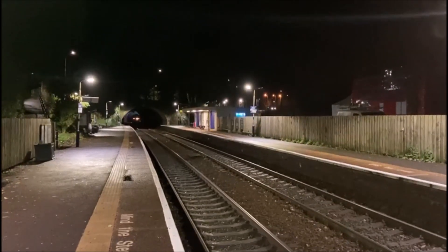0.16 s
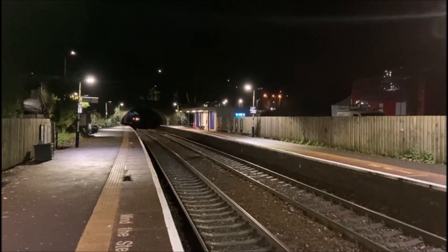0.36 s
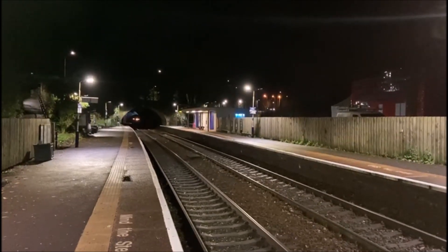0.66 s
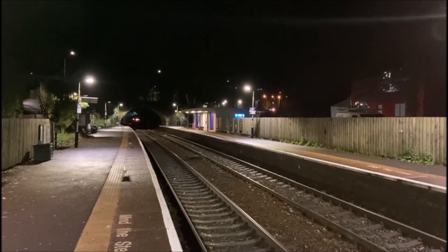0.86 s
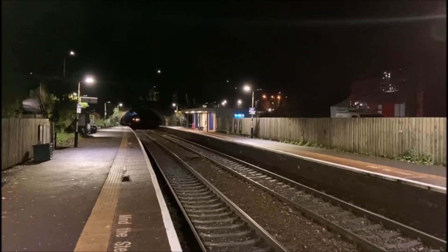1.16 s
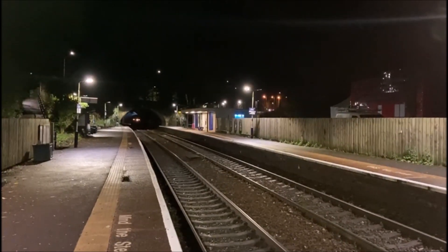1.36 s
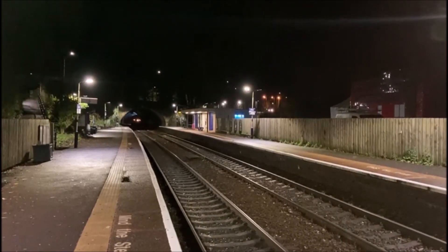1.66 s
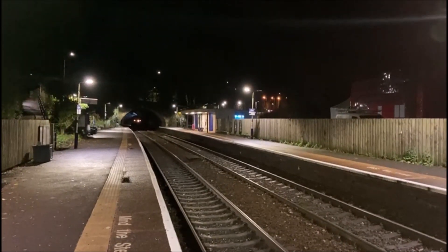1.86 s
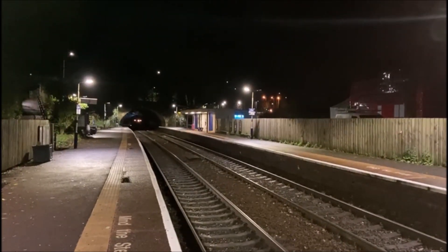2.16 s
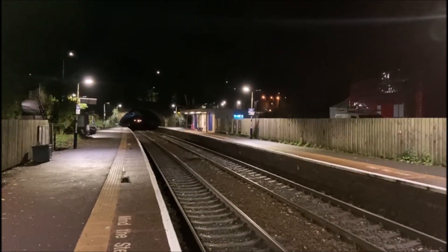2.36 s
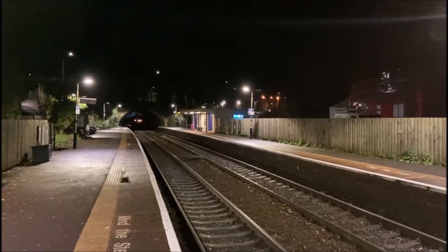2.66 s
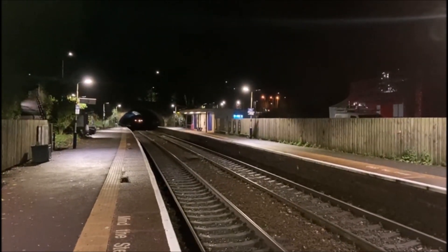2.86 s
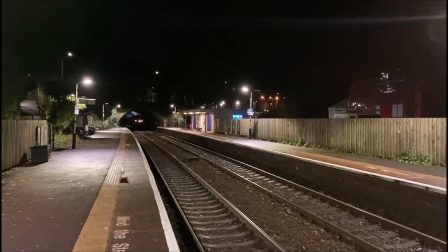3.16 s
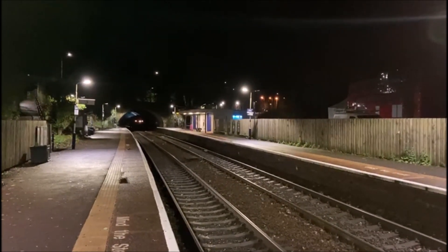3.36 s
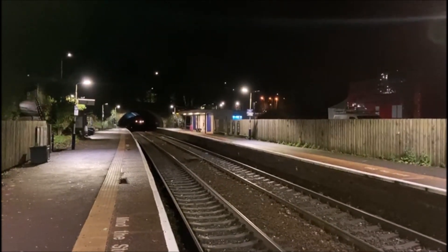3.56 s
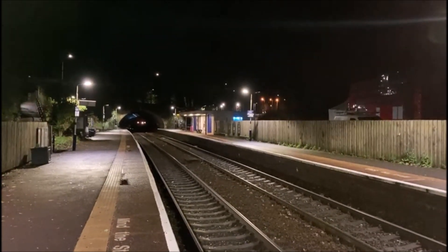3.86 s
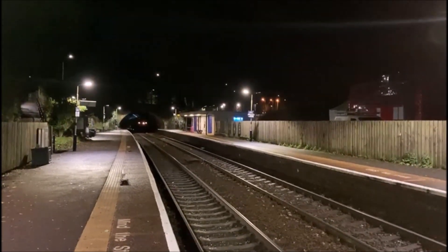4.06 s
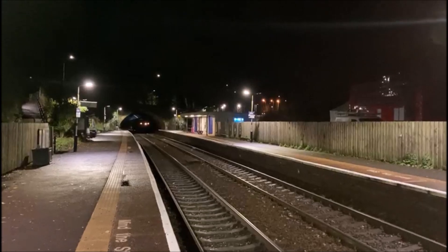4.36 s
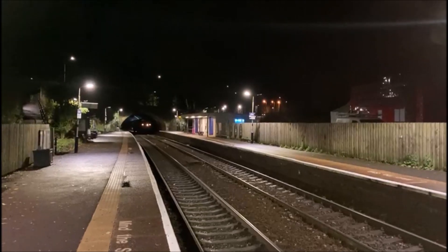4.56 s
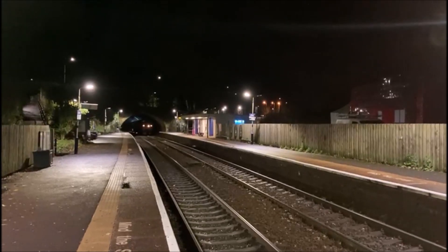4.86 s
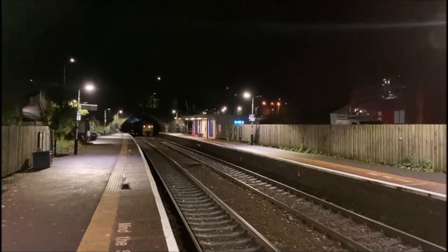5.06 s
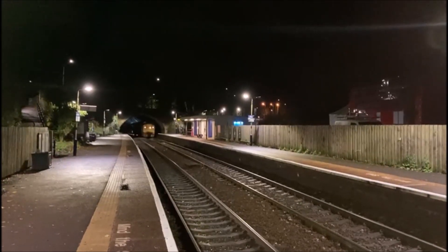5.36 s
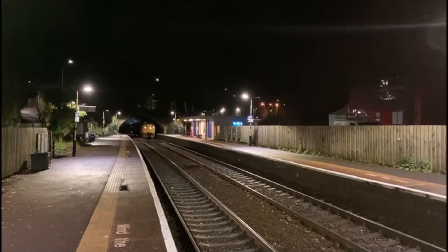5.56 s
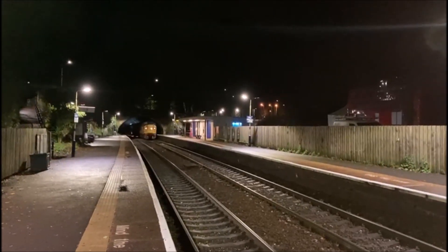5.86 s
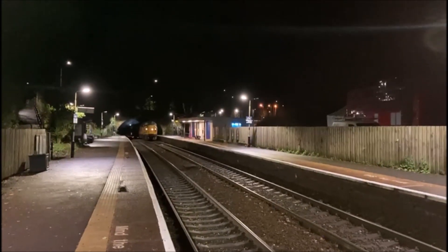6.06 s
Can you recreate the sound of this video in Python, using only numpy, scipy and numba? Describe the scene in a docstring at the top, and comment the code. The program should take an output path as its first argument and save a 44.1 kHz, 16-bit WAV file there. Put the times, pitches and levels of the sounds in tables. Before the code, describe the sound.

A rough low train horn flips into a short shrill note and echoes, then a diesel locomotive's rumble and turbo whistle swell steadily closer.

```python
"""Locomotive and horn from a night platform

A twelve-cylinder diesel locomotive speeds up out of a tunnel towards a phone with two microphone ports.
Its horn, a sum of sines on one reed, blows a rough low tone that breaks into a shrill high one.
Exhaust and generator sines drone, noise bands roar in puffs locked to the engine cycle, and narrow noise
whistles from the turbocharger. A close surface combs the sound; the cutting returns the shrill tone."""
import sys
import numpy as np
from scipy import signal
from scipy.fft import rfft, irfft, next_fast_len
from scipy.io import wavfile
from scipy.ndimage import uniform_filter1d
from numba import njit

SR = 44100
rng = np.random.default_rng(int(sys.argv[2]) if len(sys.argv) > 2 else 0)


def generate_wav(sig):
    """Save sig (samples, or channels by samples) to the path in sys.argv[1] as 16-bit PCM at SR."""
    pcm = np.round(np.clip(np.atleast_2d(sig).T, -1, 1) * 32767).astype(np.int16)
    wavfile.write(sys.argv[1], SR, pcm)


N = 274743
TIME = np.arange(N) / SR
SIZE = next_fast_len(N + SR)  # room for a second of echo
FREQ = np.maximum(np.fft.rfftfreq(SIZE, 1 / SR), 1)

BREAK_S, BREAK_LENGTH_S = .435, 0.019  # the reed flips over to the high tone
DIP_S = 0.447  # engine and echoes begin a brief dip in level


def undb(db):
    """Decibels to an amplitude factor."""
    return 10 ** (np.asarray(db) / 20)


def curves(table):
    """Columns of a time table, one value a sample."""
    s, *columns = np.transpose(table)
    return [np.interp(TIME, s, column) for column in columns]


def over_freq(table, hz=FREQ):
    """Columns of a frequency table, read on a log axis."""
    f, *columns = np.transpose(table)
    return [np.interp(np.log(hz), np.log(f), column) for column in columns]


def filtered(x, response):
    """Sound passed through a frequency response."""
    return irfft(rfft(x, SIZE) * response, SIZE)[..., :N]


def unit(x):
    """Sound scaled to an rms of 1."""
    return x / np.sqrt(np.mean(x ** 2))


def walk(rate):
    """Random levels held 1 / rate s and slewed twice; spread near 1."""
    hold = int(SR / rate)
    steps = np.repeat(rng.standard_normal(N // hold + 1), hold)
    return 1.87 * uniform_filter1d(uniform_filter1d(steps, hold), hold)[:N]


def bump(s, half_s):
    """A triangle of height 1 around a moment."""
    return np.clip(1 - abs(TIME - s) / half_s, 0, 1)


def tail(t60):
    """Left and right responses of a diffuse decay, unit energy."""
    t = np.arange(int(t60 * SR)) / SR
    decay = rng.standard_normal((2, len(t))) * undb(-60 * t / t60)
    energy = np.sum(decay ** 2, axis=1, keepdims=True)
    return rfft(decay / np.sqrt(energy), SIZE)


@njit
def svf(x, hz, width):
    """State-variable band-pass with a moving centre; both settings in Hz."""
    y, b, l = np.empty(len(x)), 0., 0.
    for i in range(len(x)):
        g, k = np.tan(np.pi * hz[i] / SR), width / hz[i]
        v = (b + g * (x[i] - l)) / (1 + g * (g + k))
        b, l, y[i] = 2 * v - b, l + 2 * g * v, k * v
    return y


def tone(turns, db, start=None):
    """A sine of given rms level; it starts at a random phase unless start (turns) is given."""
    if start is None:
        start = rng.random()
    return np.sqrt(2) * undb(db) * np.sin(2 * np.pi * (turns + start))


def ports(notch_scale):
    """A close reflection combs what both ports share; what differs is partly that reflection, partly diffuse."""
    # close surface: f/Hz, reflection against direct/dB, difference of the ports against their sum/dB,
    # share of that difference that is the reflection/0-1
    bounce_table = [(154, -12, -42, .3), (293, -3, -27.5, 0), (595, -2.5, -13.5, 0.3), (800, -4, -8, 0.6),
                    (1220, -1.5, -6.5, 0.4), (1680, -1.5, -1.5, .8), (2130, 0, 1.5, .8),
                    (2700, -3, -11.5, .7), (3020, -2, 0, .6), (3380, -1.5, 3, .5), (3750, 0.5, 10, .4),
                    (4350, -0.5, 4.5, .3), (4600, 0, 14, .3), (5080, 3.5, 15.5, .3), (5830, -11, -0.5, .3),
                    (6150, -13.5, -14, .3), (6400, -26.5, -12, .3), (7190, -20, -15, .3),
                    (9290, -29.5, 27.5, .3), (10270, -33, 34, .3), (10280, -23, -19, .3)]
    # where the reflection cancels the sound common to both ports: f/Hz
    notches_hz = [290, 780, 1180, 1640, 2040, 2430, 2880, 3330, 3830, 4200, 4660, 5040, 5450]
    # right port behind left: f/Hz, phase lag/rad
    port_lag = [(20, 0), (100, .05), (200, .1), (500, .3), (1000, .5), (1400, 0)]
    # diffuse sound added to each port: f/Hz, level/dB
    scatter = [(60, -27.5), (150, -46.5), (300, -26), (700, -11.5), (1500, -12.5), (2600, -23.5),
               (5000, -31), (6500, -20.5), (11000, -25)]
    bounce_db, side_db, share = over_freq(bounce_table)
    bounce, share = undb(bounce_db), np.clip(share, 0, 1)
    # half a turn of lag at the first notch, a whole turn more at each next one
    marks_hz = np.array([0, *notches_hz, SR]) * notch_scale
    lag_turns = np.interp(FREQ, marks_hz, [0, *np.arange(len(notches_hz)) + .5, SR / 430])
    echo = np.exp(-2j * np.pi * lag_turns)
    mid = (1 + bounce * echo) / np.sqrt(1 + bounce ** 2)
    reflected = share * (1 - echo) / np.sqrt(2)
    diffuse = np.sqrt(1 - share ** 2) * tail(0.17)[0]
    side = undb(side_db) * (reflected + diffuse)
    pair = np.array([mid + side, mid - side]) / np.sqrt(1 + undb(2 * side_db))
    lag = np.exp(-1j * np.outer((0, 1), over_freq(port_lag)[0]))
    return pair * lag + undb(over_freq(scatter)[0]) * tail(0.24)


def late(shrill, horn_ports):
    """The cutting answers with a few dull returns and a broken tail, fluttering band by band."""
    # late returns of the high tone: delay/s, level/dB, treble limit/Hz
    return_table = [(0.141, -33, 1130), (.25, -31, 1100), (.31, -26, 2000), (0.357, -8.5, 700),
                    (.42, -33, 3000), (0.585, -31, 1800)]
    # centres of the tail bands, about one to an overtone: f/Hz
    tail_bands_hz = (880, 1770, 2650, 3530, 5000)
    returns = 0
    for delay_s, db, limit_hz in return_table:
        dull = filtered(shrill, 1 / (1 + (FREQ / limit_hz) ** 2))
        returns = returns + undb(db) * np.roll(dull, int(delay_s * SR))
    wash = undb(-17) * filtered(shrill, tail(1.3) / (1 + (FREQ / 7000) ** 2))
    patchy_db, broken = 4, 0
    for row in np.eye(len(tail_bands_hz)):
        share = np.interp(FREQ, tail_bands_hz, row)
        broken = broken + filtered(wash, share) * undb(patchy_db * walk(70))
    return broken + filtered(returns * undb(2 * walk(36)), horn_ports)


def throb(cycles, per_cycle, decay, scatter_db):
    """Puffs of uneven size locked to the cycle; decay is in puff lengths."""
    turns = per_cycle * cycles
    size = undb(scatter_db * rng.standard_normal(1000))[turns.astype(int)]
    return uniform_filter1d(size * np.exp(-(turns % 1) / decay), size=400)


def roar(cycles, layers_db):
    """Overlapping bands of gas and rolling noise in four moving layers; puffs gate the upper ones."""
    # relative density of the noise before the layers are levelled: f/Hz, level per Hz/dB
    roar_colour = [(22, -29), (36, -20.5), (60, 1), (100, -18.5), (200, -11.5), (290, -2), (380, -5),
                   (520, -16), (650, -17.5), (1000, -24), (1600, -28.5), (2500, -33), (3300, -30.5),
                   (4000, -34.5), (5000, -47.5), (5500, -42.5), (6200, -54.5), (9000, -61), (11500, -65.5)]
    noise = rfft(rng.standard_normal(SIZE)) * undb(over_freq(roar_colour)[0])
    edges_hz, share_db = (30, 250, 650, 1500, 5000), (-6.5, 1.44, 1.2, 0.95)
    # level each layer from the noise energy between its edges
    gains_db = []
    for low_hz, high_hz, db, share in zip(edges_hz, edges_hz[1:], layers_db, share_db):
        inside = noise[(FREQ > low_hz) & (FREQ < high_hz)]
        rms = np.sqrt(np.sum(abs(inside) ** 2) * 2) / SIZE
        gains_db.append(db + share - 20 * np.log10(rms))
    slow_puffs = throb(cycles, per_cycle=3, decay=1.0, scatter_db=1.0)
    fast_puffs = throb(cycles, per_cycle=13, decay=0.66, scatter_db=4.5)
    puffs = unit(.5 + slow_puffs + 0.99 * fast_puffs)
    out = 0
    for octave in np.arange(-5.3, 3.7, 1 / 3):  # octaves from 1 kHz
        distance = np.clip(3 * (np.log2(FREQ / 1000) - octave), -1, 1)
        band = irfft(noise * np.cos(np.pi / 2 * distance) ** 2, SIZE)[:N]
        # place among the layers: 0 rumble, 1 middle, 2 upper middle, 3 top
        place = np.interp(octave, (-2.6, -1.2, 0, 1.2), (0, 1, 2, 3))
        db = sum(max(0, 1 - abs(place - k)) * gain for k, gain in enumerate(gains_db))
        gate = min(place / 2.0, 1)
        out = out + band * undb(db + 0.95 * walk(12)) * (1 - gate + gate * puffs)
    return out


def drone(cycles, rumble_db, middle_db):
    """Exhaust and generator lines on multiples of the cycle; changing paths make each one waver."""
    # three exhaust lines, then two generator lines: multiple of the cycle
    strong_orders = [9, 12, 18, 31.5, 63]
    # their levels: exhaust against the rumble, generator against the middle/dB
    strong_db = [-1.5, -2.5, -10.5, -9, -5.5]
    # moments when paths cancel a strong line, one list a line: t/s, half width/s, depth/dB
    fade_table = [
        [(.7, 0.99, 4.5), (3.75, 0.29, 6), (4.75, 0.4, 9), (5.9, 0.42, 31)],
        [(3.5, 0.79, 19), (5.15, 0.43, 8), (6.25, 0.69, 9.5)],
        [(1.5, 3, 14.5), (4.9, 0.62, 8)],
        [(2.7, 0.28, 6), (5.6, 0.47, 4)],
        [(2.2, 1, 16), (4.9, 0.88, 8.5), (5.55, 0.57, 26), (6.3, .4, 9)],
    ]
    # weaker exhaust lines: multiple of the cycle
    weak_orders = [6, 7, 8, 10, 11, 13, 14, 15, 16, 19, 20, 21, 22, 23, 25, 26, 27, 28, 29]
    # their levels against the rumble/dB
    weak_db = [-16, -24.5, -12.5, -21, -14, -19, -25, -19.5, -23, -23, -26.5, -17.5, -28, -17, -17.5, -29.5,
               -20.5, -15.5, -17.5]
    strong = 0
    for k, db, fades in zip(strong_orders, strong_db, fade_table):
        faded_db = sum(depth_db * bump(s, half_s) for s, half_s, depth_db in fades)
        generator = k > 20  # these lines wander in phase too
        turns = k * cycles + generator * .055 * walk(9)
        base_db = middle_db if generator else rumble_db
        strong = strong + tone(turns, base_db + db - faded_db + 1.3 * walk(8))
    nearer_db = np.interp(TIME, (3, 6.2), (-0.5, 1.5))  # upper orders gain as the stack leaves the tunnel
    weak = 0
    for k, db in zip(weak_orders, weak_db):
        weak = weak + tone(k * cycles, rumble_db + db + 2.0 * walk(4) + (k > 17) * nearer_db)
    return strong + weak


def turbo(cycles):
    """A breathy whistle at blade rate over broad intake hiss centred below it; exhaust pulses shake both."""
    # turbocharger whistle: t/s, f/Hz, level/dB
    whistle_path = [(0, 6040, -63), (1.2, 6310, -64), (2.2, 6820, -60), (3.0, 7470, -58),
                    (3.5, 7760, -55.5), (4.1, 7930, -49.5), (4.7, 8100, -45.5), (5.5, 8320, -43.5),
                    (6.23, 8120, -47.5)]
    hz, db = curves(whistle_path)
    hz = hz * (1 + .007 * walk(15))
    whistle = unit(svf(svf(rng.standard_normal(N), hz, 750.), hz, 750.))
    hiss = rng.standard_normal(N)
    for _ in range(3):
        hiss = svf(hiss, 0.67 * hz, 5700.0)
    hiss_db = np.interp(TIME, (1, 4, 5.5), (-3, 0., 3))  # flow noise gains on the whistle as boost builds
    shake = unit(.6 + throb(cycles, per_cycle=6, decay=.5, scatter_db=3.2))
    return undb(db + 0.66 * walk(5)) * shake * (whistle + undb(hiss_db) * unit(hiss))


def low_tone():
    """Notes that swell, hold and die away, a little sharp while they swell."""
    # low horn notes: start t/s, attack/s, stop t/s, release t60/s, f once swollen/Hz,
    # level before that of each partial/dB
    low_notes = [(.03, 0.072, 0.443, 0.057, 385.6, -16.5), (0.572, 0.033, 0.644, 0.36, 381.2, -23.5)]
    onset_sharp_hz = 4.7
    size, hz = 1e-4, 0  # a floor keeps the logarithm finite
    for start, attack, stop, t60, note_hz, db in low_notes:
        swell = np.clip((TIME - start) / attack, 0, 1)
        size = size + swell * undb(db - 60 * np.maximum(TIME - stop, 0) / t60)
        hz = np.where(TIME >= start, note_hz + onset_sharp_hz * (1 - swell), hz)
    return hz, 20 * np.log10(size)


def high_tone():
    """Creeps in flat and veiled, flips up bright, droops as the air runs out."""
    # high horn tone before the level of each partial: t/s, level/dB
    high_level = [(.03, -48), (.06, -34), (.1, -55), (.436, -18.5), (.456, -15), (.475, -21), (.49, -18),
                  (.496, -24), (.515, -22.5), (.527, -29.5), (.55, -38), (.575, -51)]
    # the creeping pitch sinks between these moments, before and through the flip: t/s
    sag_s = (.33, 0.52)
    sag_path_hz, shrill_hz = (870, 855), 882.6
    droop_s, droop_hz_per_s = .515, 350
    veiled_db, bright_db = -22, 2  # overtones before and after the flip
    spent_s, spent_db = .515, 4  # the fundamental gives out first, so the overtones gain on it
    flip = np.clip((TIME - BREAK_S) / BREAK_LENGTH_S, 0, 1)
    creep_hz = np.interp(TIME, sag_s, sag_path_hz)
    droop_hz = droop_hz_per_s * np.clip(TIME - droop_s, 0, .1)
    hz = creep_hz + flip * (shrill_hz - creep_hz) - droop_hz
    spent = np.clip((TIME - spent_s) / BREAK_LENGTH_S, 0, 1)
    overtone_db = veiled_db + flip * (bright_db - veiled_db) + spent * spent_db
    return hz, curves(high_level)[0], overtone_db


def air_db():
    """Horn air comes on, rushes at the flip and fades."""
    full_db, full_s, attack_db_per_s = -39.5, 0.069, 250
    fade_s, fade_db_per_s = 0.46, 227
    burst_db, burst_half_s = 12.5, 0.023
    rise_db = attack_db_per_s * np.maximum(full_s - TIME, 0)
    fade_db = fade_db_per_s * np.clip(TIME - fade_s, 0, .5)
    return full_db - rise_db - fade_db + burst_db * bump(BREAK_S, burst_half_s)


def horn():
    """Two tones and a 26 Hz beat share one reed, so sums and differences sound while both speak."""
    # horn partials; mixed rows are combination tones: multiple of low tone, of beat, of high tone
    partials = [(1, 0, 0), (1, -1, 0), (1, 1, 0), (2, 0, 0), (2, -1, 0), (4, -2, 0), (4, -1, 0), (5, -1, 0),
                (5, -2, 0), (6, -1, 0), (6, -2, 0), (7, -1, 0), (7, -2, 0), (-1, 0, 1), (1, 0, 1),
                (2, -1, 1), (2, 0, 1), (3, -1, 1), (4, -1, 1), (6, -1, 1), (0, 1, 1), (0, -1, 1), (0, 0, 1),
                (0, 0, 2), (0, 0, 3), (0, 0, 4), (0, 0, 5), (0, 0, 6), (0, 0, 7), (0, 0, 8), (0, 0, 9),
                (0, 0, 12), (4, 0, 0), (5, 0, 0), (6, 0, 0), (7, 0, 0), (5, -1, 1), (7, -1, 1), (1, 0, 2),
                (-1, 0, 3), (1, 0, 6), (1, 0, 7)]
    # own level of each partial/dB
    partials_db = [3, -14.5, -23.5, -7.5, -10.5, -34, -38, -24, -29, -34, -40, -43, -48, -10.5, -1, 0.5, -3,
                   -8.5, -17, -16.5, -12, -6, 1.5, 3.5, -7, -13.5, -26, -20.5, -29, -37.5, -34.5, -40.5,
                   -43, -26.5, -36.5, -38, -21, -18, -2, -1.5, -18, -16]
    # overtones of the low tone: t/s, level/dB
    edge_path = [(.05, -18), (.1, -9.5), (.16, 0), (.21, 4), (.24, -8.5), (.28, -1), (.4, -6.5),
                 (.47, 13.5), (.56, -9)]
    # relative density of the horn air: f/Hz, level per Hz/dB
    air_colour = [(200, -10.5), (600, -13.5), (1600, 1.5), (3000, -4), (4200, -8.5), (5500, -5.5),
                  (7000, -10), (9000, -12.5), (11500, -22)]
    # fading end of an earlier horn note: f/Hz, level at t = 0/dB, t60/s
    earlier_note = [(289, -23.5, 1), (565, -34, 0.3), (813, -47.5, 0.63), (1460, -45, 0.4)]
    low_hz, low_db = low_tone()
    high_hz, high_db, bright_db = high_tone()
    low, high = np.cumsum(low_hz) / SR, np.cumsum(high_hz) / SR  # turns
    beat = 26 * (TIME - 0.1613)  # turns, from a moment when the overtones of the low tone are loudest
    edge_path_db = curves(edge_path)[0]
    edge_db = edge_path_db + 1.3 * walk(30)  # one reed: partials keep step, so overtones come in bursts
    # the octave follows a swell of the overtones only in part, but dies away with them
    octave_db = np.where(TIME < DIP_S, .3, 1.3) * edge_path_db
    rough, shrill = 0, 0
    for (a, b, c), db in zip(partials, partials_db):
        turns = a * low + b * beat + c * high
        if c == 0:
            level_db = low_db + db
            if a > 2:
                level_db = level_db + edge_db + 2.2 * walk(40)
            elif a == 2:
                level_db = level_db + octave_db
            rough = rough + tone(turns, level_db, start=0)
        elif a or b:
            level_db = low_db + 10.0 + high_db + db + bright_db * (c > 1)
            rough = rough + tone(turns, level_db, start=0)
        else:
            level_db = high_db + db + bright_db * (c > 1) + 0.38 * walk(46.0)
            shrill = shrill + tone(turns, level_db, start=.4)  # common phase: the reed snaps in sharp pulses
    breath = unit(filtered(rng.standard_normal(N), undb(over_freq(air_colour)[0])))
    air = breath * undb(air_db() + 0.5 * np.cos(2 * np.pi * beat))  # the beat shakes the air
    earlier = sum(tone(hz * TIME, db - 60 * TIME / t60) for hz, db, t60 in earlier_note)
    sounding = np.clip((1.3 - TIME) / 0.25, 0, 1)
    # only the loud part after the flip carries far enough to echo
    echoing = shrill * np.clip((TIME - BREAK_S) / BREAK_LENGTH_S, 0, 1)
    return (rough + shrill + air + earlier) * sounding, echoing


def scene():
    """The locomotive nears the two ports while its horn sounds and the cutting answers."""
    # engine speed: t/s, four-stroke cycle rate f/Hz
    cycle_path = [(0, 5.99), (.6, 6.115), (.95, 6.27), (1.3, 6.355), (2.1, 6.52), (3.0, 6.865),
                  (3.55, 6.995), (4.5, 7.087), (5.5, 7.372), (6.23, 7.524)]
    # roar as it nears: t/s, rumble level/dB, middle level/dB, upper middle level/dB, top level/dB
    roar_path = [(0, -34.5, -36.5, -46, -50.5), (1.1, -32, -38, -44, -51.5), (1.7, -31, -37, -43, -51),
                 (2.3, -26.5, -34, -42, -50), (2.9, -25, -32, -40, -48.5), (3.4, -22.5, -29, -35.5, -48),
                 (3.8, -23.5, -26, -31, -44), (4.2, -20.5, -23.5, -33, -39.5),
                 (4.7, -19.5, -21.5, -27.5, -37), (5.2, -18.5, -21.5, -26, -35),
                 (5.7, -16, -23, -24, -33.5), (6.23, -14, -23, -28, -36)]
    cycles = np.cumsum(curves(cycle_path)[0]) / SR
    rumble_db, middle_db, *upper_db = curves(roar_path)
    # engine and echoes dip briefly after the shrill tone
    fall_s, hold_s, rise_s, depth_db = 0.047, 0.14, 0.14, -9
    dip_times = np.cumsum((DIP_S, fall_s, hold_s, rise_s))
    dip = undb(depth_db * np.interp(TIME, dip_times, (0, 1, 1, 0)))
    blast, shrill = horn()
    wavering_rumble_db = rumble_db + 3.5 * walk(8.1)
    engine = drone(cycles, rumble_db, middle_db)
    engine = engine + roar(cycles, (wavering_rumble_db, middle_db, *upper_db))
    horn_ports = ports(1.024)  # the reflection of the horn takes a slightly shorter path
    near = filtered(dip * engine + turbo(cycles), ports(1)) + filtered(blast, horn_ports)
    return near + dip * late(shrill, horn_ports)


def record(dry):
    """The phone cuts the deepest bass and, steeply, the top."""
    low_cut_hz, top_hz = 32, 11700
    dry = signal.sosfilt(signal.butter(2, low_cut_hz, "high", fs=SR, output="sos"), dry)
    return signal.sosfilt(signal.ellip(10, .2, 80, top_hz, fs=SR, output="sos"), dry)


dry = scene()
out = record(dry)
generate_wav(out)
```